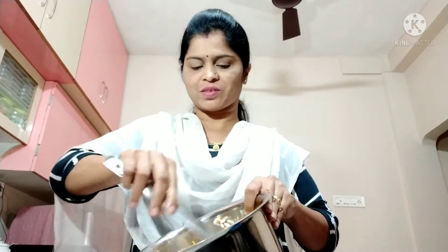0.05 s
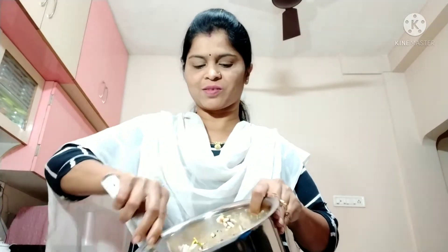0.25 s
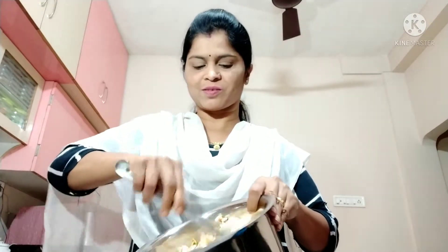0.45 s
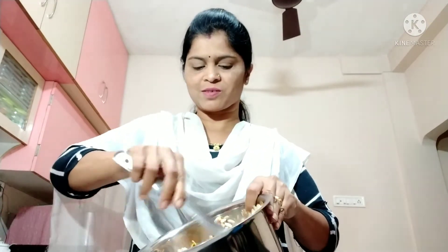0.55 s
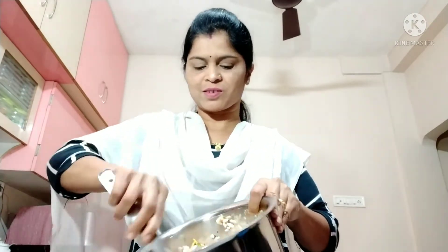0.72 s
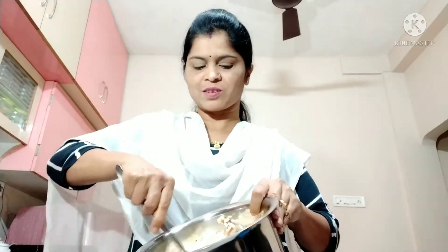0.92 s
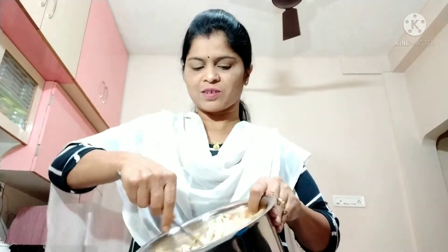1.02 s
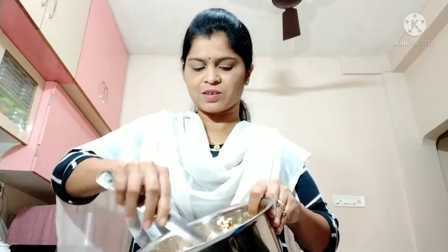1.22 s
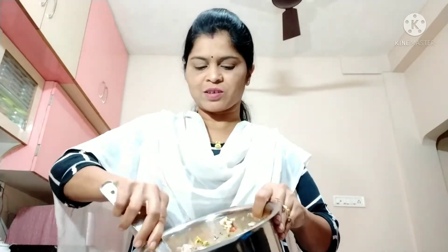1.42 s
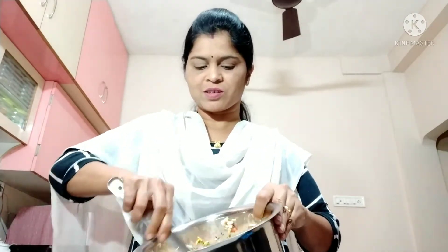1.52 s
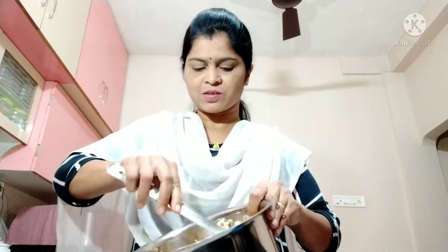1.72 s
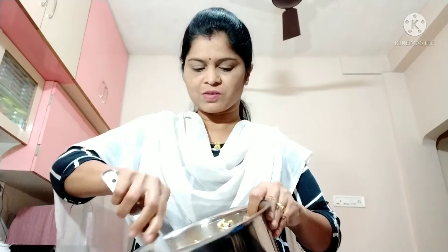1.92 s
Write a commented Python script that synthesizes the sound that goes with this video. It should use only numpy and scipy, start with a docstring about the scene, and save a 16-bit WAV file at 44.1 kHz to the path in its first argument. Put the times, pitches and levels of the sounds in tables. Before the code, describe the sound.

Dry puffed rice rustles as a spoon stirs it, knocking on a steel pan.

```python
"""Dry puffed rice rustles in surges as a metal spoon stirs it in a hand-held steel pan.
Colliding grains click, a few crack, and sliding ones keep the wall ringing faintly. The spoon
rubs the base, clinks on the wall and knocks dully on the rice-damped base; the pan rumbles in
the hand. A small hard-walled kitchen reverberates. The hardest knock just overloads the microphone."""
import sys
import numpy as np
from scipy import signal
from scipy.fft import rfft, irfft
from scipy.io import wavfile
from scipy.ndimage import uniform_filter1d

SR = 44100
rng = np.random.default_rng(int(sys.argv[2]) if len(sys.argv) > 2 else 0)


def to_wav(sig):
    """Store sig (one row per channel, or 1-D mono) as 16-bit WAV at the path in sys.argv[1].

    Samples outside -1..1 are clipped; the rate is SR.
    """
    pcm = np.clip(np.atleast_2d(sig), -1, 1) * 32767
    pcm = np.round(pcm).astype(np.int16)
    wavfile.write(sys.argv[1], SR, pcm.T)  # frames by channels


N = 85995
T = np.arange(N) / SR
HZ = np.fft.rfftfreq(N, 1 / SR)

# stirring effort (time [s], relative level [dB])
STIR_EFFORT = [(0, -35.5), (.045, -40), (.15, -36.5), (.21, -42.5), (.3, -38), (.41, -36), (.48, -41),
               (.545, -38.5), (.59, -41), (.68, -38.5), (.77, -38), (.87, -43), (.93, -37.5), (1.01, -40.5),
               (1.12, -44), (1.16, -42.5), (1.19, -36), (1.28, -37.5), (1.35, -44), (1.42, -42),
               (1.48, -42), (1.58, -36), (1.67, -45), (1.73, -47), (1.825, -38.5), (1.95, -45)]
# spectrum of spilling and cracking rice (frequency [Hz], relative density [dB])
CRISP_SPECTRUM = [(1000, -10), (3000, 6), (6000, 0), (8500, 9.5), (11000, 7.5), (14000, 5), (16000, 2)]
# pan wall modes (frequency [Hz], relative level [dB], t60 [s])
WALL_MODES = [(616.7, 6, 0.11), (702, 7, 0.066), (840, 3.5, 0.039), (1110, -5, 0.019), (1313, -2, 0.042),
              (1500, -3, 0.046), (2163, 2, 0.019), (2490, 0, 0.029), (2722, -7, 0.084), (2889, -3, 0.045),
              (3102, -4.5, 0.028), (3180, -17, 0.023), (4090, -5, 0.024)]
# likeness of room sound between channels (frequency [Hz], correlation [0-1])
ROOM_CORRELATION = [(150, 1), (350, 0.94), (650, 0.31), (1200, 0), (2500, 0)]


def amp(db):
    """Decibels to gain."""
    return 10 ** (np.asarray(db) / 20)


def unit(x):
    """Scales to rms 1."""
    return x / np.sqrt(np.mean(x ** 2) + 1e-20)


def peaked(x):
    """Scales to peak 1."""
    return x / (abs(x).max() + 1e-20)


def read(points, hz):
    """Interpolates over log frequency."""
    f, value = np.transpose(points)
    return np.interp(np.log(hz + 1), np.log(f), value)


def curve(points):
    """Interpolates over time."""
    return np.interp(T, *np.transpose(points))


def swells(rows):
    """Sum of Gaussian envelopes."""
    return sum(amp(db) * np.exp(-.5 * ((T - s) / sigma_s) ** 2) for s, sigma_s, db in rows)


def colour(x, gain):
    """Filters by a gain per frequency."""
    return irfft(rfft(x) * gain, N)


def convolve(x, response):
    """Convolves each channel with a response."""
    return signal.fftconvolve(np.atleast_2d(x), np.atleast_2d(response), axes=1)[:, :N]


def pair(x, correlation):
    """Makes two independent channels partly alike."""
    correlation = np.clip(correlation, -1, 1)
    mid = colour(x[0], np.sqrt((1 + correlation) / 2))
    side = colour(x[1], np.sqrt((1 - correlation) / 2))
    return np.array([mid + side, mid - side])


def add(mix, start_s, sound):
    """Mixes a sound in place."""
    part = mix[:, max(round(start_s * SR), 0):]
    part += sound[..., :part.shape[1]]


def ring(modes, ratio=1):
    """Decaying sines; neighbouring modes swing in opposite directions."""
    return sum((-1) ** k * amp(db) * np.exp(-np.log(1000) * T / t60) * np.sin(2 * np.pi * hz * ratio * T)
               for k, (hz, db, t60) in enumerate(modes))


def impacts(per_s, spread_db):
    """Random impulses of uneven size, scattered between the channels."""
    size = amp(spread_db * np.minimum(rng.exponential(1, N), 5))
    hits = rng.random(N) < per_s / SR
    return unit(size * hits * rng.standard_normal((2, N)))


def burst(spectrum_db, peak_s):
    """Noise puff that peaks at peak_s, then decays."""
    noise = unit(colour(rng.standard_normal((2, N)), amp(spectrum_db)))
    return noise * T / peak_s * np.exp(1 - T / peak_s)


def kitchen(x, wet_db, gap_s=0.0024):
    """Direct sound plus a dense tail that dies faster in the treble."""
    # reverberation time (frequency [Hz], t60 [s])
    room_t60 = [(100, 0.9), (200, 0.44), (380, 0.31), (650, 0.4), (2500, 0.3), (8000, 0.16), (15000, 0.22)]
    hz, t, spectra = signal.stft(rng.choice([-1., 1.], (2, N)), SR, nperseg=256)
    decay = np.exp(-np.log(1000) * t / read(room_t60, hz)[:, None])
    tail = signal.istft(spectra * decay, SR, nperseg=256)[1][:, :N]
    tail = pair(tail, read(ROOM_CORRELATION, HZ)) * np.clip(T / gap_s - 1, 0, 1)
    return x + amp(wet_db) * convolve(x, tail / np.linalg.norm(tail[0]))


def crackle(per_s=5000, pitch_range_hz=(1500, 14560), pitches=18, decay_cycles=2.27):
    """Colliding grains, each ringing briefly at its own pitch."""
    t = T[:round(SR / 100)]
    out = np.zeros((2, N))
    for hz in np.geomspace(*pitch_range_hz, pitches):
        ping = unit(np.exp(-t * hz / decay_cycles) * np.sin(2 * np.pi * hz * t))
        out += np.sqrt(hz) * convolve(impacts(per_s / pitches, spread_db=3), ping)
    return unit(out)


def tumble(spectrum, clump_db=2.5, left_lag_s=.00045):
    """Clumps of grains roll over each other, nearer the right microphone."""
    # stereo balance of the rice (frequency [Hz], left minus right [dB])
    balance = [(2000, 1.5), (7000, -0.3), (10000, -1.5), (12500, -4), (15000, -2.5)]
    clumps = unit(uniform_filter1d(rng.standard_normal(N), size=600))
    clicks = pair(crackle(), correlation=0.44) * amp(clump_db * clumps)
    clicks[0] = np.roll(clicks[0], round(left_lag_s * SR))
    balance_db = np.outer([.5, -.5], read(balance, HZ))
    return unit(colour(kitchen(clicks, wet_db=4), amp(read(spectrum, HZ) + balance_db)))


def rustle(gain_db=3):
    """Rice rustles as the spoon pushes it and hisses brighter as it slides off."""
    # spectrum of pushed rice (frequency [Hz], relative density [dB])
    pushed_spectrum = [(300, 3), (900, 5.5), (1700, -2.5), (2700, 8), (3500, 4), (4300, 7), (5500, 3.5),
                       (7200, 6), (8600, 10), (10000, 7.5), (13000, 1), (15000, 1.5), (16000, -60)]
    # rice sliding off the spoon (centre [s], sigma [s], level [dB])
    spills = [(.005, .012, -33), (.112, .024, -36), (.368, 0.049, -32), (.693, 0.012, -31),
              (.93, 0.027, -47), (1.183, 0.02, -33.5), (1.55, 0.037, -25.5), (1.82, 0.011, -41)]
    pushed = tumble(pushed_spectrum) * amp(curve(STIR_EFFORT) + gain_db)
    return pushed + tumble(CRISP_SPECTRUM) * swells(spills)


def scrape(rms_db=-47, effort_exponent=0.73, low_hz=2000):
    """Grains sliding along the steel wall keep its upper modes ringing."""
    upper_modes = [mode for mode in WALL_MODES if mode[0] > low_hz]
    wall = convolve(impacts(per_s=2700, spread_db=2.5), ring(upper_modes))
    wall *= amp(effort_exponent * curve(STIR_EFFORT))
    return amp(rms_db) * unit(kitchen(wall, wet_db=-10))


def base_note(ratio=1, contact_s=0.0002, low_hz=217):
    """Hollow ring of the base after a rice-cushioned blow; the pan is too small to radiate bass."""
    # rice-damped base modes at ratio 1 (frequency [Hz], relative level [dB], t60 [s])
    base_modes = [(294.8, -8.5, 0.036), (456.4, 0, 0.016), (545.4, -0.5, 0.027), (686, -15, 0.027)]
    blow = T * np.exp(-T / contact_s)
    highpass = signal.butter(2, low_hz, "high", fs=SR, output="sos")
    return signal.sosfilt(highpass, convolve(blow, ring(base_modes, ratio))[0])


def rub(gain_db=1.5):
    """Small slips of the spoon excite the base."""
    # rubbing strength (time [s], relative level [dB])
    strength = [(0, -45), (.2, -45), (.243, -35), (.3, -45), (.54, -45), (.59, -53), (.67, -45),
                (.765, -36), (.83, -40), (.88, -48), (1.05, -44), (1.14, -49), (1.35, -48), (1.42, -38.5),
                (1.465, -37), (1.55, -45), (1.68, -48), (1.8, -49), (1.885, -42), (1.95, -46)]
    # how a slip drives the base (frequency [Hz], gain [dB])
    drive = [(180, 1), (285, 5), (430, -3.5), (520, -3.5), (600, 4), (750, 5.5)]
    slips = pair(impacts(per_s=5700, spread_db=2), correlation=0.92)
    base = colour(convolve(slips, base_note()), amp(read(drive, HZ)))
    return unit(kitchen(base, wet_db=-2)) * amp(curve(strength) + gain_db)


def air(noise_db=-43.5):
    """Steady room noise with a faint hum."""
    # room noise spectrum (frequency [Hz], relative density [dB])
    spectrum = [(20, -8), (50, -9), (95, -1), (160, -9), (300, -6), (600, -7), (1000, -20), (3000, -14),
                (15000, -54)]
    # hum (frequency [Hz], peak [dB])
    tones = [(118, -53.5)]
    noise = pair(rng.standard_normal((2, N)), read(ROOM_CORRELATION, HZ))
    noise = colour(noise, amp(read(spectrum, HZ)))
    hum = sum(amp(db) * np.sin(2 * np.pi * (hz * T + rng.random())) for hz, db in tones)
    return amp(noise_db) * unit(noise) + hum


def cracks():
    """Single grains snap under the spoon."""
    # grain snaps (time [s], dry level [dB])
    snaps = [(.108, -27), (.345, -34), (.383, -27), (.6945, -24), (1.373, -42), (1.54, -20.5), (1.553, -28),
             (1.7746, -28)]
    dry = np.zeros((2, N))
    for s, db in snaps:
        add(dry, s, amp(db) * burst(read(CRISP_SPECTRUM, HZ), peak_s=.0008))
    return kitchen(dry, wet_db=-4)


def clinks(chatter=0.095, bite_octaves=.22):
    """The spoon's edge strikes the wall and bites along it; where it lands decides which modes ring."""
    # wall strikes (time [s], dry peak [dB], band centre [Hz], spread [octaves], contact [s], bite [dB])
    strikes = [(.165, -36, 1034, 0.23, 0.047, -47), (0.2484, -18.5, 1840, 0.65, 0.009, -37),
               (.438, -19.5, 2220, 0.26, .003, -33), (0.8881, -13.5, 940, 0.35, 0.0031, -29),
               (0.8893, -16, 2920, 0.22, 0.0014, -31), (.899, -26, 2780, .4, 0.0051, -33),
               (1.18, -18.5, 3000, 0.27, 0.0057, -25.5), (1.477, -28, 1500, 0.52, 0.0057, -30)]
    dry = np.zeros((2, N))
    for s, db, hz, octaves, contact_s, bite_db in strikes:
        modes = [(f, level - 3 * (np.log2(f / hz) / octaves) ** 2, t60) for f, level, t60 in WALL_MODES]
        force = (T == 0) + chatter * rng.standard_normal((2, N)) * np.exp(-T / contact_s)
        add(dry, s, amp(db) * peaked(convolve(force, ring(modes))))
        band_db = -3 * (np.log2((HZ + 1) / hz) / bite_octaves) ** 2
        add(dry, s, amp(bite_db) * burst(band_db, contact_s / 2))
    return kitchen(dry, wet_db=-5)


def handling(centre_hz=100.4, sigma_hz=26.5):
    """The pan rumbles as it shifts in the hand."""
    # pan shifts (centre [s], sigma [s], level [dB])
    shifts = [(.19, .025, -43), (.29, 0.044, -48), (.8, 0.062, -36), (1.46, 0.053, -42), (1.63, 0.062, -60),
              (1.92, 0.042, -44)]
    noise = pair(rng.standard_normal((2, N)), correlation=0.99)
    band = np.exp(-.5 * ((HZ - centre_hz) / sigma_hz) ** 2)
    return unit(colour(noise, band)) * swells(shifts)


def knocks(mid_base_hz=487):
    """The spoon hits the base: a dull hollow note and a tick of crushed grains."""
    # base strikes (time [s], dry peak [dB], pitch [Hz], tick level [dB])
    strikes = [(.248, 4, 532.4, -21.5), (0.2555, -1, 556, -29), (0.7914, -14.5, 544, -24),
               (0.8902, -30.5, 368, -21.5), (1.4754, -3, 492, -28), (1.881, -29.5, 502, -47)]
    # crushed-grain spectrum (frequency [Hz], relative density [dB])
    tick_spectrum = [(100, 3), (1300, -2), (2600, -9.5), (4000, 2.5), (6000, -2.5), (9000, -4),
                     (15000, -7.5)]
    # first echoes off the kitchen walls (delay [s], gain [dB])
    echoes = [(.0168, -9), (.028, -29), (.036, -26)]
    notes, ticks = np.zeros((2, 2, N))
    for s, db, hz, tick_db in strikes:
        add(notes, s, amp(db) * peaked(base_note(hz / mid_base_hz)))
        add(ticks, s, amp(tick_db) * burst(read(tick_spectrum, HZ), peak_s=.0017))
    out = kitchen(notes, wet_db=-7.5, gap_s=0.01) + kitchen(ticks, wet_db=-2.5)
    for delay_s, db in echoes:
        add(out, delay_s, amp(db) * notes)
    return out


def scene():
    """Rice, spoon and pan over the kitchen's background noise."""
    return rustle() + cracks() + scrape() + rub() + handling() + knocks() + clinks() + air()


def record(dry):
    """Microphone overload at full scale, then a band limit."""
    cutoff_hz = 15600
    lowpass = signal.firwin(401, cutoff_hz, window=("kaiser", 9), fs=SR)
    return signal.oaconvolve(np.clip(dry, -1, 1), lowpass[None], "same")


dry = scene()
out = record(dry)
to_wav(out)
```